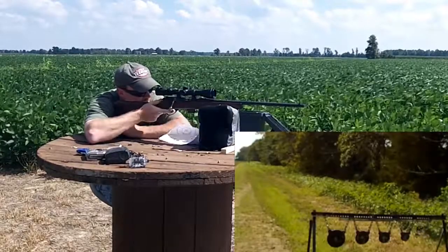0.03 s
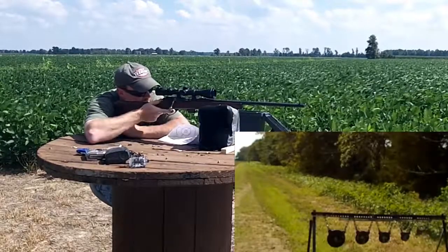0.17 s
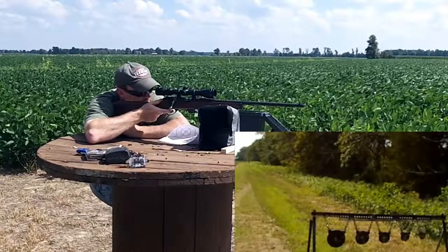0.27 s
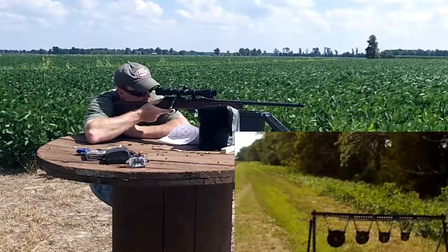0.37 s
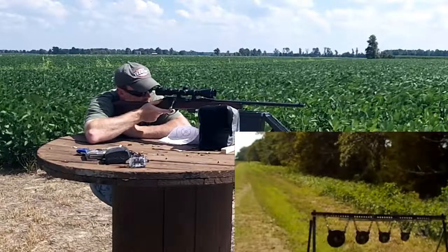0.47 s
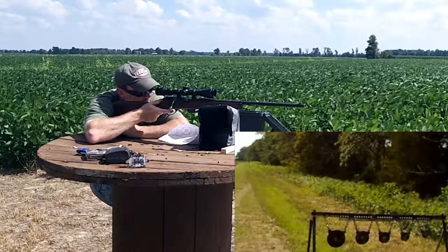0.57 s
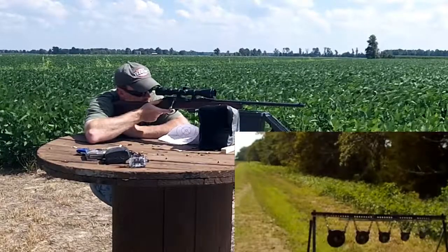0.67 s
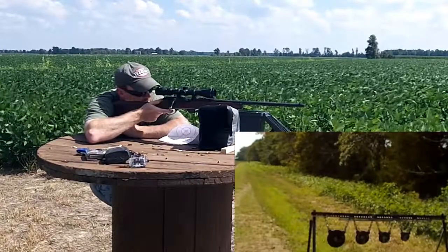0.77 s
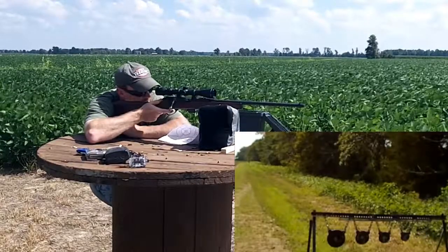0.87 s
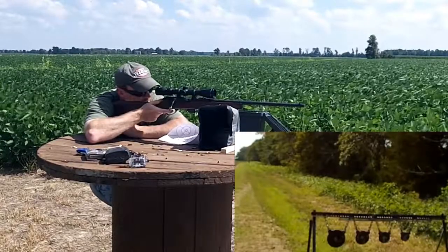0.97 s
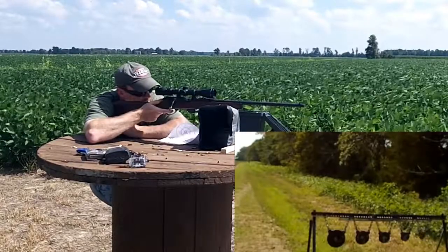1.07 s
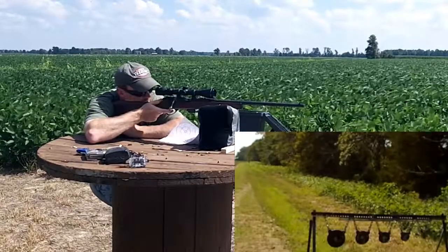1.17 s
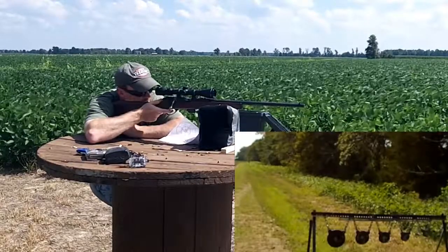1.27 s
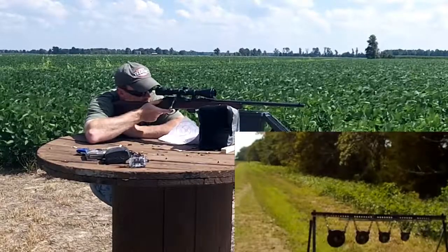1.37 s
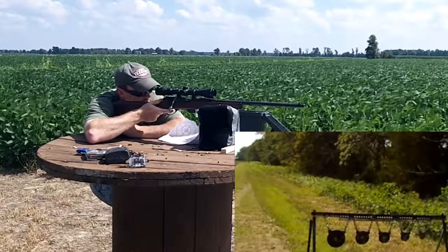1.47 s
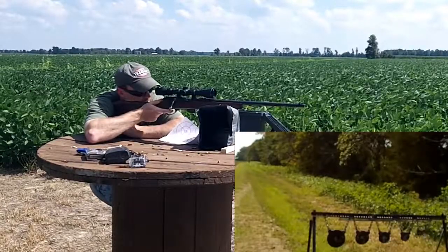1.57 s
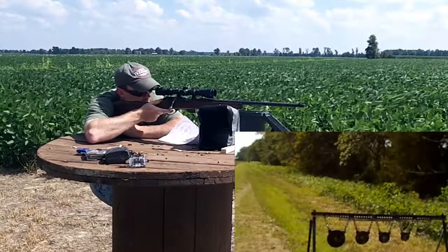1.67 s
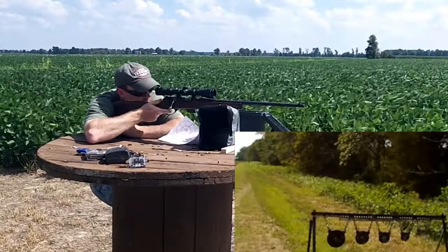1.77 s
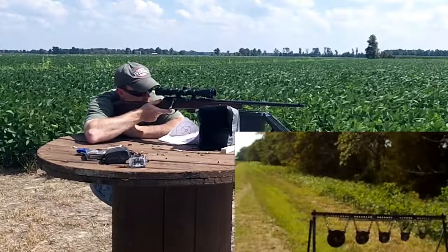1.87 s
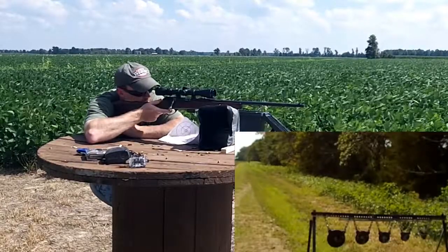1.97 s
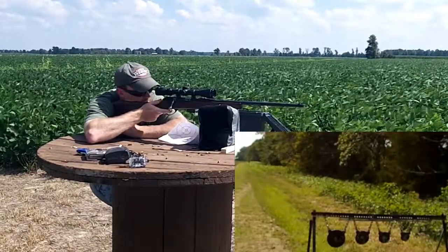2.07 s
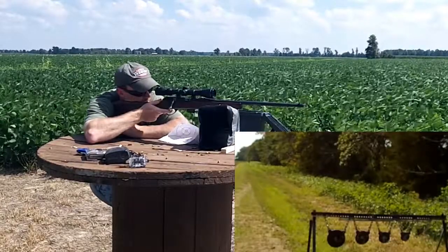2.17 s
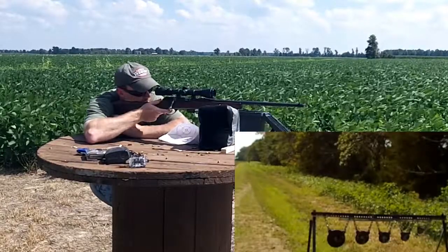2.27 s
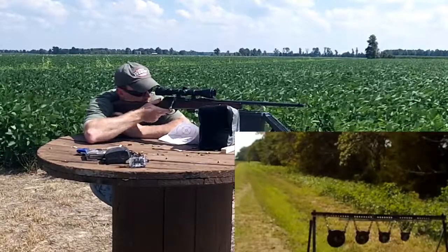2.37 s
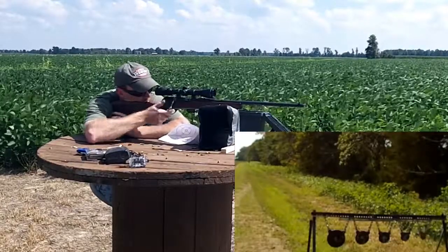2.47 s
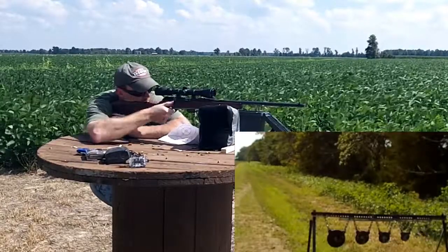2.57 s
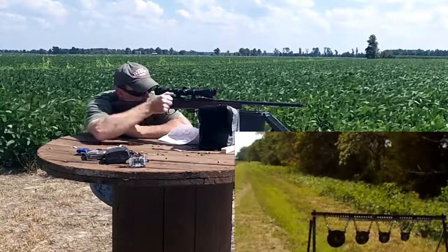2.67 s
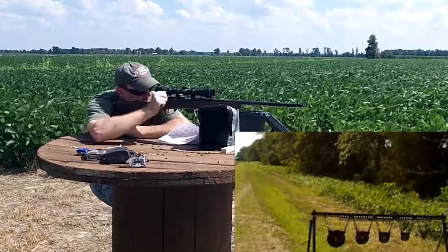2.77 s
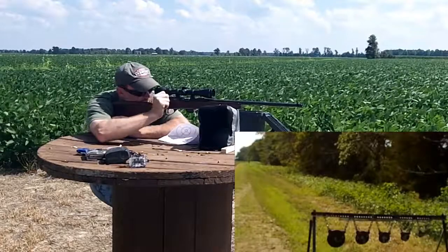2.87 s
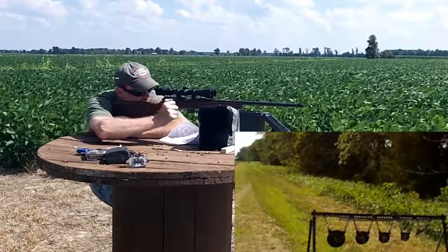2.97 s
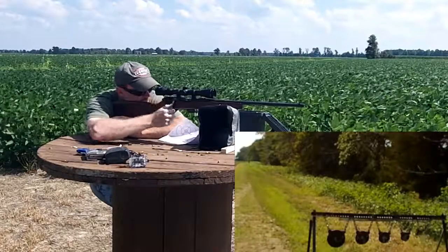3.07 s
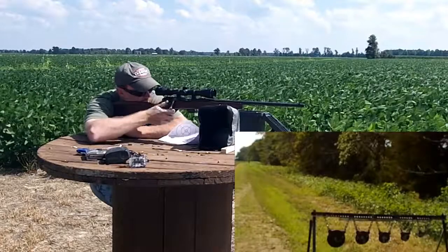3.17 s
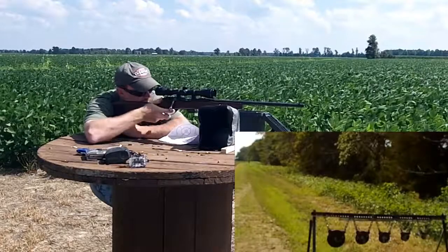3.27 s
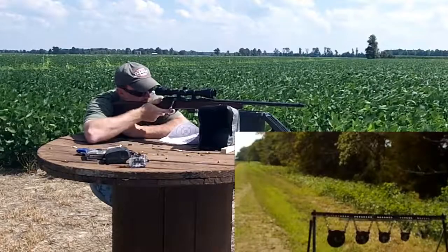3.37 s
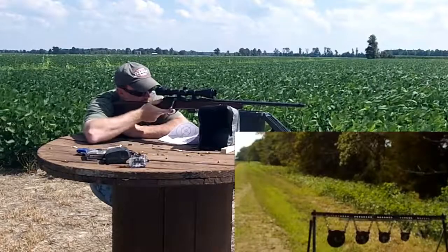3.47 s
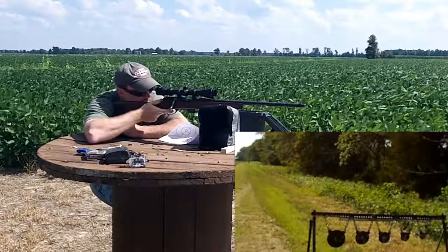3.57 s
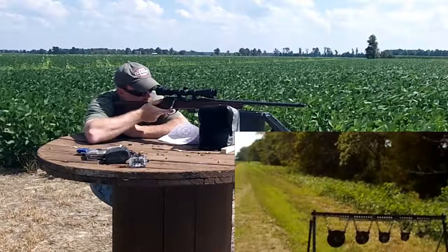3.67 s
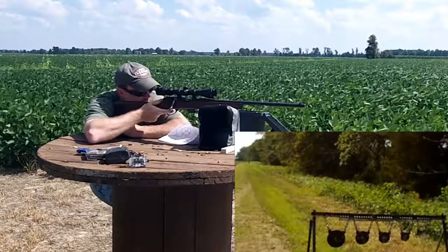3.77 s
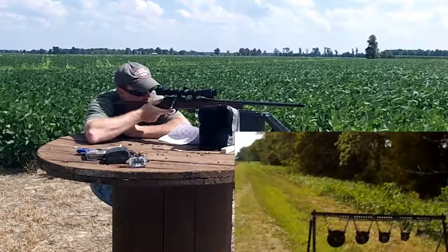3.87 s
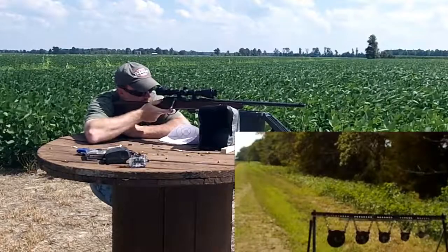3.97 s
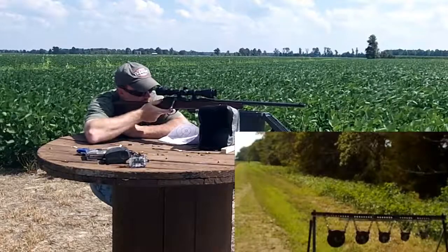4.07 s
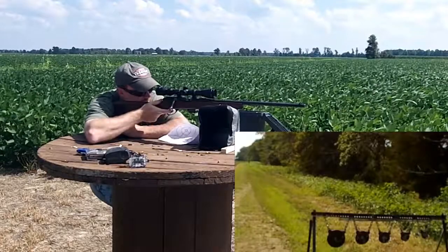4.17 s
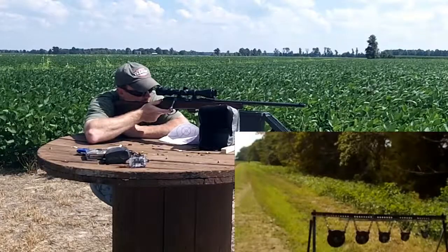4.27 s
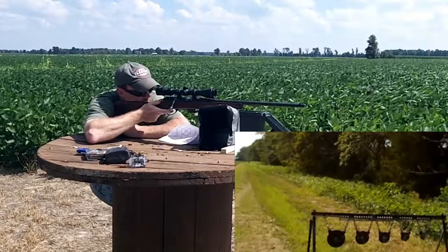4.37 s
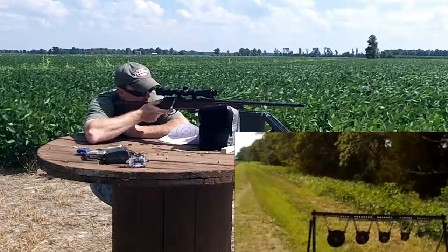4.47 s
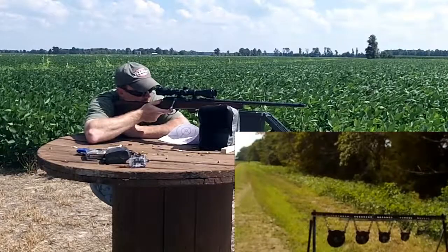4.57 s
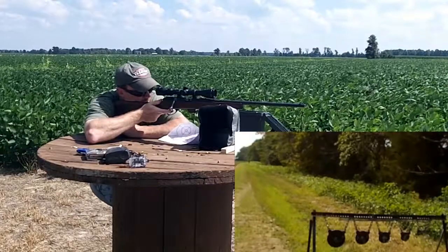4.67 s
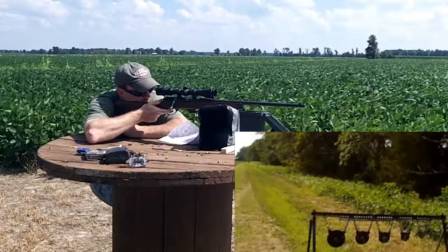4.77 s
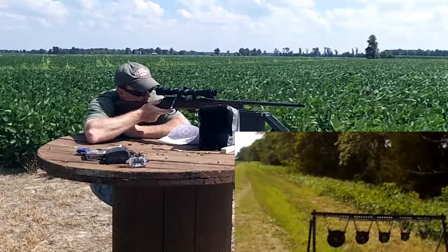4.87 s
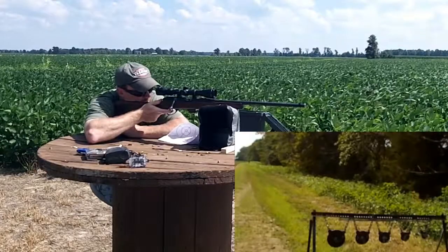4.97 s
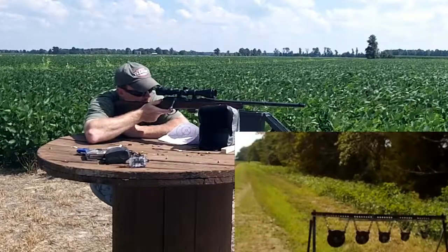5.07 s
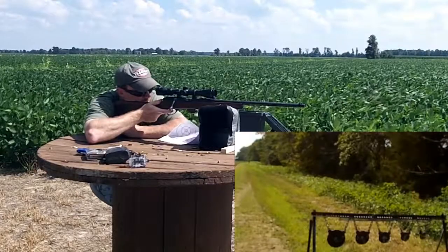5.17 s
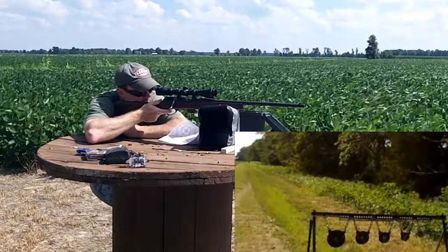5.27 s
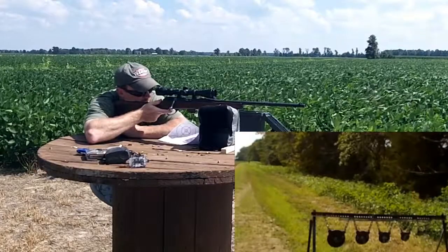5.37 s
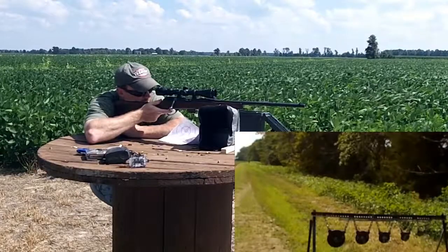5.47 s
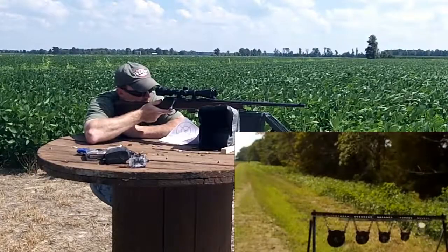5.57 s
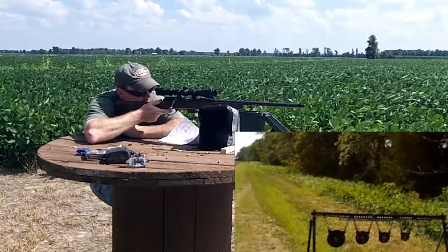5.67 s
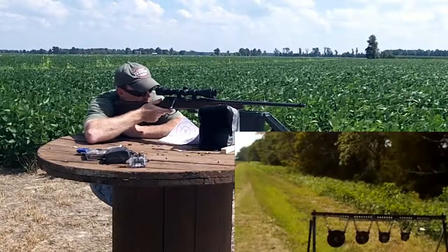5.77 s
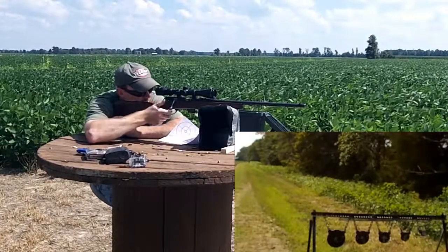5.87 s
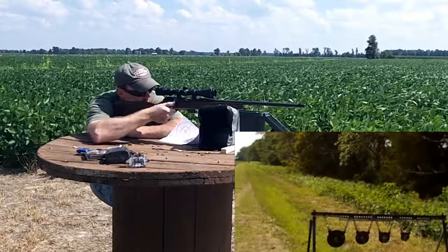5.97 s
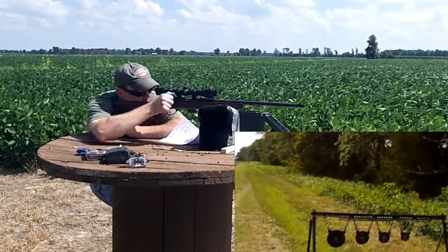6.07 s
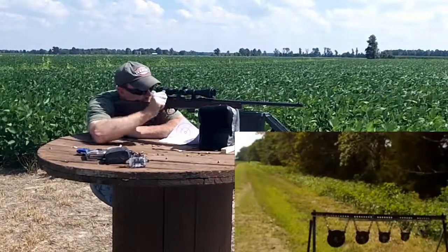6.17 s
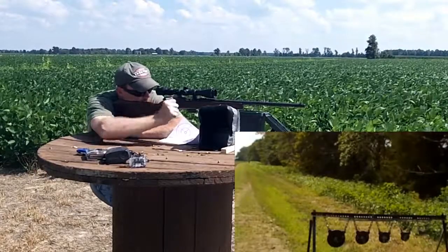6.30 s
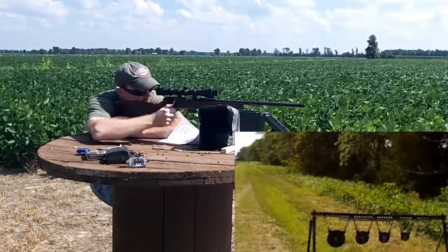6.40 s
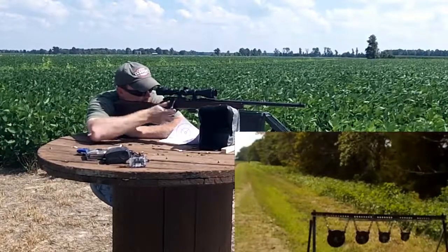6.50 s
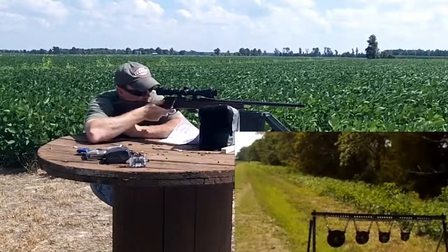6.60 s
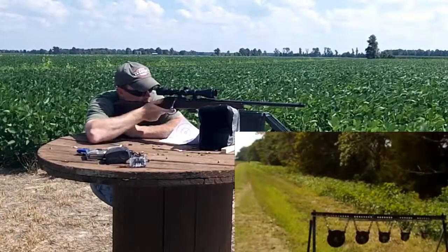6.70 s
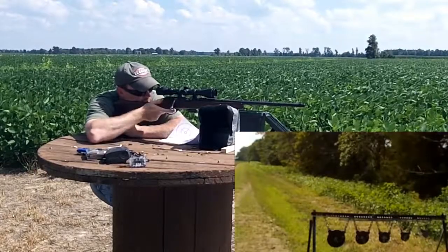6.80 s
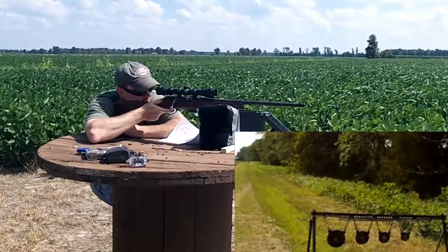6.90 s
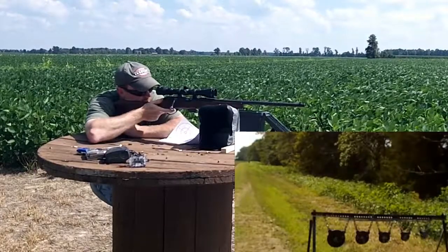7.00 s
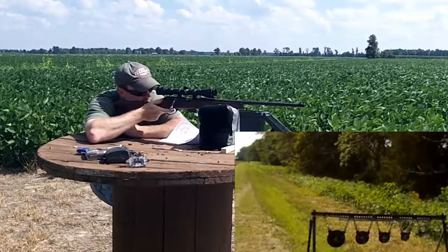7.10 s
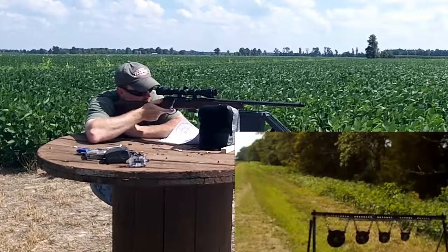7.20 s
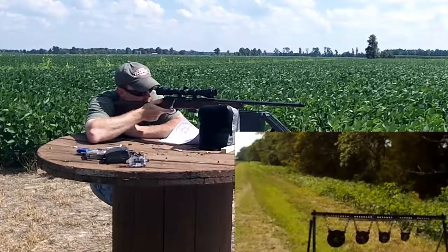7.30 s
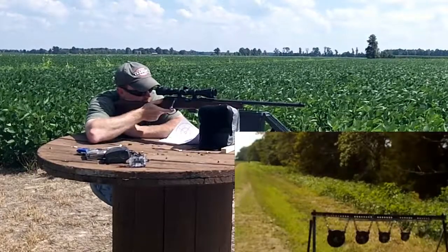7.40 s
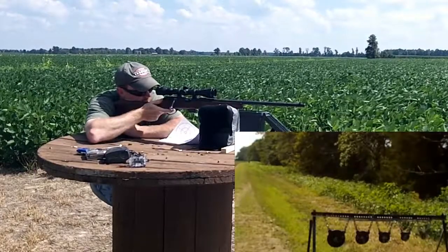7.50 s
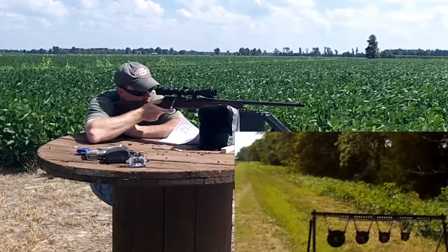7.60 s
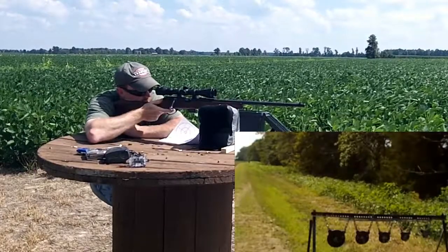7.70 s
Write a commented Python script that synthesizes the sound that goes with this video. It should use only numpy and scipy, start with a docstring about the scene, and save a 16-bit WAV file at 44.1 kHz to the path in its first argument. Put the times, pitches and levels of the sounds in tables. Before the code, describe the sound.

A light wind rumbles on the microphone in an open field, with faint birds far away. A small rifle fires a sharp crack that echoes briefly from distant trees, then its bolt is worked with four quick metallic clacks. A few seconds later a second shot cracks and echoes, and the bolt clicks open and shut again as a stronger gust buffets the microphone.

```python
"""Beside a bean field, a small-bore rifle is fired twice from a table; after each shot the bolt is worked.
The crack overloads the microphone, scatters from the crop and echoes from two distant lines of trees.
The bolt's steel contacts excite the resonances of the action. Turbulent wind buffets the microphone,
with one strong gust near the end, and birds call far away over a steady hiss."""
import sys
import numpy as np
from scipy import signal
from scipy.fft import rfft, irfft, next_fast_len
from scipy.io import wavfile
from scipy.ndimage import uniform_filter1d, map_coordinates

SR = 44100
rng = np.random.default_rng(int(sys.argv[2]) if len(sys.argv) > 2 else 0)


def master(y):
    """Save y as 16-bit WAV."""
    cut = np.clip(np.atleast_2d(y).T, -1, 1)
    pcm = np.round(cut * 32767)  # scale
    wavfile.write(sys.argv[1], SR, pcm.astype(np.int16))


N = 341412

# The shots. Each row: start in seconds, level in dB, gain of the crop's scatter in dB.
SHOTS = [(1.8395, 0, 2), (5.3697, -.5, -1)]
# Pressure fronts of a shot. Each row: delay in seconds, relative level in dB, 60 dB decay in seconds.
FRONTS = [(.0031, -1.5, 0.0012), (.0044, 10, 0.0016), (.0078, -13.5, .004)]
# Thumps of muzzle gas, direct and off the ground.
# Each row: delay in seconds, level in dB, frequency in Hz, 60 dB decay in seconds.
GAS_THUMPS = [(.0038, -12, 110, 0.027), (0.0343, -20.5, 300, 0.016)]
# Treble sizzle, direct and off the ground. Each row: delay in seconds, level in dB, fade in dB/s.
SIZZLES = [(0, -35.5, 300), (0.034, -25, 2001.5), (.044, -35, 230.5)]
# The hollow report, direct and off the ground.
# Each row: delay in seconds, level in dB, rise in seconds, hold in seconds, fade in dB/s.
REPORTS = [(0, -4, 0.0015, 0.0038, 3498.5), (0.022, -8.5, .006, .009, 650)]
# Short hollow pings: the first two are the report itself, the rest its echoes.
# Each row: delay in seconds, peak in dB, mean centre frequency in Hz.
PINGS = [(.0074, -9, 1490), (0.0088, -4, 1415), (0.0233, -3, 1440), (0.0475, -17, 1570),
         (0.0495, -11.5, 1550), (0.0698, -17, 1550), (0.0758, -11, 1496), (0.083, -9.5, 1580),
         (0.101, -12, 1400), (0.1198, -11, 1270), (0.136, -11, 1480), (.145, -24, 1400), (.162, -15, 1510),
         (0.1934, -12, 1345), (0.199, -4, 1330), (0.215, -23, 1360), (0.227, -20, 1390), (.234, -15, 1380)]
# The crack's echoes from the trees. Each row: delay in seconds, level in dB, hold in seconds, fade in dB/s.
TREE_ECHOES = [(0.298, -21, 0.0083, 169), (.456, -23.5, 0.0031, 125), (.52, -64, .005, 150)]
# The duller muzzle blast rolling back from the trees. Each row: delay in seconds, level in dB.
ROLLS = [(0.315, -33), (0.491, -26), (.615, -42.5), (0.686, -34)]
# Sharp returns from the trees. Each row: delay in seconds, peak in dB.
SHARP_RETURNS = [(0.3103, -20.5), (0.3219, -6.5), (0.3418, -15), (.502, -6.5), (0.623, -21)]
# Spectra of the parts of a shot. Each row: frequency in Hz, relative level in dB.
FRONT_COLOUR = [(30, -4), (130, -3), (320, -5), (700, -12.5), (1500, -12.5), (4200, -2), (6500, -11),
                (10000, -36), (16000, -10)]
REPORT_COLOUR = [(100, -29.5), (400, -37.5), (800, -15), (1100, -4.5), (1400, 7.5), (1800, -5.5),
                 (2400, -16.5), (5000, -94), (12000, -72)]
SCATTER_COLOUR = [(100, -38), (400, -27), (900, -6.5), (1600, 4), (2600, 2.5), (4500, 2.5), (5700, -6),
                  (7000, -18), (9000, -27.5), (13000, -48.5)]
ROLL_COLOUR = [(100, -21), (350, -14.5), (650, 1), (1200, 8), (2000, 1.5), (3500, -11), (6000, -25),
               (12000, -63)]
TARGET_COLOUR = [(300, -34), (1100, -19.5), (1700, -10), (2200, 5), (3100, 2), (4000, -14), (5500, -1.5),
                 (7000, -19), (10000, -31.5), (14000, -39)]
THUD_COLOUR = [(15, 4), (50, 6), (130, -6.5), (300, -21), (1000, -55), (4000, -81.5)]
SIZZLE_COLOUR = [(3000, -33), (8000, -8.5), (9500, 6), (14500, 8.5), (16500, -14)]

# Steel contacts within each stroke of the bolt.
# Each row: time from the end stop in seconds, level in dB, bass gain in dB, treble gain in dB.
LIFT_CONTACTS = [(-.0626, -15, 20, -4), (-.0192, -15.5, 10, 0), (-.0085, -4.5, 6, 3), (0, -2, 6.5, 0)]
DRAW_CONTACTS = [(-.034, -25, 17, -14), (-.0095, -6.5, 2.4, -6), (-.0048, -12, 3, 2.5), (0, -1.5, 4, 7.5)]
PUSH_CONTACTS = [(-.0284, -11, 7, -1), (-.0203, -8, 4, 3), (-.0135, -5.5, -10, -2), (0, 0, -5, -0.5),
                 (.03, -24, 4, -17)]
LOCK_CONTACTS = [(0, -3, 2.1, -5.5)]
# Strokes after each shot. Each row: time of the end stop in seconds, gain in dB, stretch of the run-up.
LIFTS = [(2.7615, -1, 1.0), (6.164, -0.5, 1.05)]
DRAWS = [(2.8588, 0, 1.0), (6.2342, 0, 1.08)]
PUSHES = [(3.02, 0, 1.0), (6.3652, 0, 0.77)]
LOCKS = [(3.0991, 0, 1.0), (6.4533, -4, 1.0)]
# Stray light ticks of the bolt and rifle, during and after the strokes.
# Each row: start in seconds, level in dB, bass gain in dB, treble gain in dB.
STRAY_TICKS = [(3.5348, -35, 28.5, 8), (6.3312, -23, 18, -10), (6.9147, -25.5, -2, 0),
               (6.9286, -35, 0, -21)]
# Resonances of the action. Each row: frequency in Hz, bandwidth in Hz, relative level in dB.
STEEL_MODES = [(1406, 160, -3), (1586, 140, -6), (1830, 103, 2), (2100, 116, -2), (2500, 200, -2),
               (2810, 110, 4.5), (3233, 77, -1.5), (3880, 220, 1.5), (4230, 145, 5), (4600, 260, 3),
               (4850, 100, 4), (5120, 104, 4), (6070, 230, -1), (6670, 150, -10.5), (9150, 280, -11.5),
               (11240, 110, -13.5)]
# Spectrum of a steel contact. Each row: frequency in Hz, relative level in dB.
BOLT_COLOUR = [(100, -28), (400, -11.5), (900, -13), (1500, 1.5), (3000, -0.5), (4500, 6.5), (6000, 0),
               (7000, -6), (12000, -28), (16000, -53)]

# The breeze on the microphone. Each row: time in seconds, level in dB.
BREEZE = [(0, -54), (.06, -39.5), (.75, -39), (1.17, -36), (1.3, -47), (1.8, -47), (1.97, -53), (2.5, -48),
          (2.7, -36.5), (3.1, -49.5), (3.85, -45.5), (4.4, -48.5), (4.65, -46), (4.8, -40), (4.95, -48.5),
          (5.3, -38), (5.47, -45.5), (5.9, -40), (6.0, -32), (6.95, -26), (7.28, -50), (7.74, -50.5)]
# Rumbling puffs and roaring gusts. Each row: start in seconds, hold in seconds, level in dB.
PUFFS = [(0.055, 0.066, -34), (0.13, 0.021, -36.5), (.23, .03, -42), (0.355, 0.038, -31.5),
         (0.416, 0.058, -30), (.565, 0.023, -35.5), (0.682, 0.027, -30), (.815, 0.04, -31),
         (0.88, 0.028, -31), (.94, 0.017, -34), (1.021, 0.048, -31), (1.09, 0.062, -29.5),
         (1.196, 0.024, -35), (1.408, 0.041, -35.5), (1.697, 0.011, -33), (2.957, 0.032, -37),
         (3.217, 0.066, -35.5), (3.34, .02, -36.5), (3.494, .08, -42), (3.644, 0.068, -35.5),
         (3.798, 0.043, -35), (3.88, 0.027, -37), (3.985, .02, -38.5), (4.1, 0.013, -34.5),
         (4.166, 0.016, -40), (4.69, 0.04, -41), (5.028, 0.0077, -35.5), (5.125, 0.015, -34.5),
         (5.297, 0.028, -39.5), (5.64, 0.12, -28), (5.946, 0.042, -34.5), (6.098, 0.016, -22),
         (6.386, 0.044, -23), (7.086, 0.021, -35), (7.403, 0.038, -38), (7.554, 0.014, -34)]
GUSTS = [(6.167, 0.013, -25.5), (6.387, 0.018, -26), (6.569, .36, -23)]
# Eddies popping on the microphone. Each row: start in seconds, peak in dB.
EDDY_POPS = [(0.442, -22.5), (0.899, -24.5), (1.108, -26), (5.311, -28), (6.213, -9), (6.411, -12),
             (6.437, -12.5), (6.546, -19), (6.603, -11), (6.68, -16), (6.755, -14), (6.84, -16),
             (6.93, -8.5), (6.959, -12.5), (7.007, -20.5), (7.129, -22.5)]
# Bird whistles. Each row: start and length in seconds, first and last pitch in Hz, level in dB.
WHISTLES = [(.21, 0.18, 3420, 3410, -54), (4.8, 0.095, 4020, 4050, -61), (4.905, 0.14, 3490, 3470, -63),
            (5.04, 0.165, 3490, 3850, -63), (5.205, .16, 3980, 4220, -61), (7.05, 0.27, 4000, 4450, -67)]
# Short crow-like calls. Each row: midpoint in seconds, level in dB.
CAWS = [(.18, -56), (.4, -57), (.67, -59), (.85, -56), (1.17, -52), (1.35, -56), (1.671, -57),
        (4.91, -53.5), (5.18, -55), (7.18, -55), (7.5, -56.5), (7.671, -56)]
# Spectra of the wind, the calls and the field's hiss. Each row: frequency in Hz, relative level in dB.
RUMBLE_COLOUR = [(12, -32), (20, 5.5), (54, 4.5), (163, -4.5), (282, -15), (348, -20.5), (386, -20.5),
                 (612, -40.5), (700, -42), (910, -54), (1540, -120)]
ROAR_COLOUR = [(40, -22), (150, 4), (430, 2.5), (700, -6), (1100, -18), (1700, -32.5), (3000, -55.5),
               (8000, -80)]
CAW_COLOUR = [(1000, -40), (1300, 2), (1390, 12), (1480, -38), (1800, -47)]
HISS_COLOUR = [(180, -25.5), (300, -11.5), (470, -8.5), (614, -5), (656, -8.5), (1390, -9), (1640, -11.5),
               (1810, -8.5), (2170, -12), (4160, -11), (5700, -15.5), (7820, -27.5), (9090, -22.5),
               (14500, -21), (16000, -31.5)]
# The microphone's narrow treble notch. Each row: frequency in Hz, gain in dB.
MICROPHONE_NOTCH = [(6900, 0), (7400, -2.5), (7750, -19.5), (8050, -8.5), (8450, -3), (9000, -0.5)]


def rifle():
    """Superposition: each shot is the blast, the hollow report and their reflections from the field."""
    out, t = np.zeros(N), np.arange(2 * SR) / SR
    for start, db, crop_db in SHOTS:
        add(out, start, amp(db) * (blast(t) + report_and_echoes(t, crop_db)))
    return out


def blast(t):
    """Sudden expansion of gas radiates steep pressure fronts, a low push and a fading sizzle."""
    out = np.zeros(len(t))
    for delay, db, t60 in FRONTS:
        add(out, delay, amp(db + 8) * pulse(FRONT_COLOUR, t60))
    for delay, db, hz, t60 in GAS_THUMPS:  # each swings down, rebounds and is gone
        add(out, delay, -amp(db - 60 * t / t60) * np.sin(2 * np.pi * hz * t))
    thud = steadied(noise(THUD_COLOUR, len(t)), 0.015) * amp(-22.5 - 60 * t / 0.09)
    bursts = [amp(db) * swell(t, delay, rise=0.00105, hold=0, fade=fade) for delay, db, fade in SIZZLES]
    sizzle = power_sum(bursts) * noise(SIZZLE_COLOUR, len(t))
    return out + thud + sizzle


def report_and_echoes(t, crop_db):
    """Reflection and scattering: distinct echoes and a diffuse wash follow the direct report."""
    size = len(t)
    onset_s, flight_s = 0.0013, 0.21  # the crop's wash holds while the bullet flies over it
    report = [amp(db) * swell(t, delay, rise, hold, fade) for delay, db, rise, hold, fade in REPORTS]
    linger = amp(-20.5) * swell(t, 0, onset_s, hold=0, fade=62)
    hollow_noise = steadied(noise(REPORT_COLOUR, size), 0.003)
    out = power_sum(report + [linger]) * hollow_noise * amp(-0.5 + 1.6 * wobble(220, size))

    near_leaves = amp(-19.5) * swell(t, 0, onset_s, hold=0, fade=382.5)
    crop = amp(-31 + crop_db) * swell(t, 0, onset_s, hold=flight_s, fade=45)
    out += power_sum([near_leaves, crop]) * noise(SCATTER_COLOUR, size) * amp(1.7 * wobble(397.6, size))

    trees = [amp(db) * swell(t, delay, 0.013, hold, fade) for delay, db, hold, fade in TREE_ECHOES]
    out += power_sum(trees) * bough_scatter(size, spread_db=6)

    rolls = [amp(db) * swell(t, delay, rise=0.0087, hold=0.0044, fade=380) for delay, db in ROLLS]
    diffuse_roll = amp(-40) * swell(t, 0, onset_s, hold=0.65, fade=39)
    out += power_sum(rolls + [diffuse_roll]) * noise(ROLL_COLOUR, size) * amp(2 * wobble(150.3, size))

    for delay, db, centre_hz in PINGS:
        add(out, delay, amp(db) * ping(centre_hz * (1 + 0.11 * rng.standard_normal())))
    add(out, 0.2468, amp(-4) * pulse(TARGET_COLOUR, t60=0.003))  # the bullet strikes the target
    for delay, db in SHARP_RETURNS:
        add(out, delay, amp(db) * pulse(ROLL_COLOUR, t60=0.008))
    return out


def ping(centre_hz):
    """Impulse response: a short hollow ring of peak 1, with the report's spectrum moved to centre_hz."""
    report_hz = max(REPORT_COLOUR, key=lambda point: point[1])[0]
    retuned = [(hz * centre_hz / report_hz, db) for hz, db in REPORT_COLOUR]
    ring = coloured(signal.unit_impulse(SR // 16), retuned)
    return ring / np.abs(ring).max()


def bough_scatter(size, spread_db):
    """Scattering by trunks and boughs: a dense patter of unequal echoes, of rms 1."""
    strengths = amp(spread_db * np.minimum(rng.standard_normal(size), 3))
    return unit(coloured(strengths * rng.standard_normal(size), SCATTER_COLOUR))


def bolt():
    """Impact excitation: each steel contact rings the action and scatters off table and leaves."""
    out, t = np.zeros(N), np.arange(SR // 4) / SR
    bin_hz = np.fft.rfftfreq(len(t), 1 / SR)
    for start, db, bass_db, treble_db in bolt_contacts() + STRAY_TICKS:
        contact_t = t * amp(db) ** 0.079  # a harder contact is over sooner
        contact = (1 - np.exp(-contact_t / 0.00091)) ** 2 * amp(-60 * contact_t / 0.013)
        rattle = contact * steadied(rng.standard_normal(len(t)), 0.0006)
        # each spot favours its own modes
        modes = [(hz, width, mode_db + rng.normal(0, 3.6)) for hz, width, mode_db in STEEL_MODES]
        crack = coloured(contact * steadied(rng.standard_normal(len(t)), 0.001), BOLT_COLOUR)
        clack = amp(1) * ringing(rattle, modes) + amp(-0.5) * crack
        # heavy contacts knock, hard ones tick
        tilt = [(600, bass_db), (3000, 0.00056), (5000, 0.01), (11000, treble_db)]
        clack = irfft(rfft(clack) * gain_at(tilt, bin_hz), len(t))
        scatter = noise(BOLT_COLOUR, len(t)) * (1 - np.exp(-t / 0.0014)) * amp(-60 * t / 0.27)
        add(out, start, amp(db) * (clack + amp(-39) * scatter))
    return out


def bolt_contacts():
    """Travel time: a quicker hand shortens the run-up to a stop as it lifts, draws, pushes and locks."""
    cycle = [(LIFT_CONTACTS, LIFTS), (DRAW_CONTACTS, DRAWS),
             (PUSH_CONTACTS, PUSHES), (LOCK_CONTACTS, LOCKS)]
    return [(stop + (offset * stretch if offset < 0 else offset), stroke_db + db, bass_db, treble_db)
            for contacts, strokes in cycle
            for stop, stroke_db, stretch in strokes
            for offset, db, bass_db, treble_db in contacts]


def ringing(x, modes):
    """Modal superposition: x drives a sum of damped resonators, at unit power gain."""
    f = np.fft.rfftfreq(len(x), 1 / SR)
    body = sum((-1) ** k * amp(db) * 1j * f * width / (hz * hz - f * f + 1j * f * width)
               for k, (hz, width, db) in enumerate(modes))
    return irfft(rfft(x) * body / np.sqrt(np.mean(np.abs(body) ** 2)), len(x))


def wind():
    """Turbulent pressure rumbles on the microphone; faster air adds a brighter roar and pops."""
    t = np.arange(N) / SR
    puffs = [amp(db) * swell(t, start, rise=0.012, hold=hold, fade=422) for start, hold, db in PUFFS]
    gusts = [amp(db) * swell(t, start, rise=0.028, hold=hold, fade=189) for start, hold, db in GUSTS]
    breeze = amp(np.interp(t, *np.transpose(BREEZE)))
    force = power_sum([breeze] + puffs) * amp(3.24 * wobble(25, N))
    rumble = amp(-0.5) * force * steadied(noise(RUMBLE_COLOUR, N), 0.052)
    roar = power_sum(gusts) * amp(2.6 * wobble(90, N)) * steadied(noise(ROAR_COLOUR, N), 0.03)
    flutter_gain = amp(-24.5) * force * (force / amp(-28.5)) ** 1.6  # grows faster than the rumble
    flutter = flutter_gain * amp(4.3 * wobble(35, N)) * steadied(noise(ROAR_COLOUR, N), 0.065)
    out = rumble + roar + flutter
    for start, db in EDDY_POPS:
        speed = amp(db + 18) ** 0.81  # a faster eddy pops louder, brighter and shorter
        colour = [(hz * speed, band_db) for hz, band_db in ROAR_COLOUR]
        add(out, start, amp(db) * pulse(colour, t60=0.06 / speed))
    return out


def birds():
    """Tone and noise: far whistles are gliding sinusoids, hoarse calls are narrow bands of noise."""
    out = np.zeros(N)
    for start, length, first_hz, last_hz, db in WHISTLES:
        progress = np.linspace(0, 1, int(length * SR))
        hz = (first_hz + (last_hz - first_hz) * progress) * (1 + 0.003 * wobble(68, len(progress)))
        arch = np.sqrt(np.abs(np.sin(np.pi * progress)))
        envelope = amp(db + 2.5 * wobble(23.6, len(progress))) * arch
        add(out, start, envelope * np.sin(2 * np.pi * np.cumsum(hz) / SR))
    window = np.hanning(int(0.055 * SR))
    for midpoint, db in CAWS:
        add(out, midpoint - len(window) / SR / 2, amp(db) * window * noise(CAW_COLOUR, len(window)))
    return out


def amp(db):
    """Amplitude ratio of a level in decibels."""
    return 10 ** (np.asarray(db) / 20)


def unit(x):
    """Normalisation to rms 1."""
    return x / np.sqrt(np.mean(x ** 2) + 1e-20)


def gain_at(colour, hz):
    """Amplitude of a spectrum, interpolated in dB on a logarithmic frequency axis."""
    knot_hz, db = np.transpose(colour)
    return amp(np.interp(np.log(hz + 1), np.log(knot_hz + 1), db))


def coloured(x, colour):
    """Minimum-phase filtering: x takes on this spectrum causally, at unit power gain."""
    size = 2 * next_fast_len(len(x) // 2 + 4096)
    gain = unit(gain_at(colour, np.fft.rfftfreq(size, 1 / SR)))
    cepstrum = irfft(np.log(gain + 1e-6))
    cepstrum[1:size // 2] *= 2
    cepstrum[size // 2 + 1:] = 0
    return irfft(rfft(x, size) * np.exp(rfft(cepstrum)))[:len(x)]


def noise(colour, size):
    """Spectral shaping of white noise, to rms 1."""
    gain = gain_at(colour, np.fft.rfftfreq(size, 1 / SR))
    return unit(irfft(rfft(rng.standard_normal(size)) * gain, size))


def steadied(x, seconds):
    """Division by the running rms evens out the chance swells of noise."""
    return x / np.sqrt(np.abs(uniform_filter1d(x ** 2, max(int(seconds * SR), 2))) + 1e-9)


def wobble(rate, size):
    """Random modulation: a smooth curve through rate knots a second."""
    knots = rng.standard_normal(int(size * rate / SR) + 4)
    return map_coordinates(knots, [np.arange(size) * rate / SR])


def pulse(colour, t60):
    """A pressure transient of peak 1: noise that decays 60 dB in t60 seconds, then is coloured."""
    t = np.arange(SR // 16) / SR
    burst = coloured(steadied(rng.standard_normal(len(t)), 0.0002) * amp(-60 * t / t60), colour)
    return burst / np.abs(burst).max()


def swell(t, start, rise, hold, fade):
    """An envelope: linear rise and hold in seconds, then exponential decay at fade dB/s."""
    return np.clip((t - start) / rise, 0, 1) * amp(-fade * np.maximum(t - start - rise - hold, 0))


def power_sum(gains):
    """Incoherent addition: the powers of unrelated sounds add."""
    return np.sqrt(sum(gain ** 2 for gain in gains))


def add(track, start, x):
    """Superposition of x on track from start, in seconds."""
    part = track[max(round(start * SR), 0):][:len(x)]
    part += x[:len(part)]


def scene():
    """Pressures add: rifle, bolt, wind and birds over the steady hiss of the field."""
    hiss = amp(-54) * noise(HISS_COLOUR, N)
    return (rifle() + bolt() + wind() + birds() + hiss)[None]


def record(dry):
    """Filtering and saturation: the microphone notches the treble, clips the blast and limits the band."""
    top_hz, taper_hz = 16600, 700
    size = next_fast_len(N + SR // 2)
    hz = np.fft.rfftfreq(size, 1 / SR)
    notched = irfft(rfft(dry, size) * gain_at(MICROPHONE_NOTCH, hz), size)
    clipped = np.clip(notched, -1, 1)
    low_pass = np.sin(np.pi / 2 * np.clip((top_hz - hz) / taper_hz, 0, 1)) ** 2
    return irfft(rfft(clipped) * low_pass, size)[:, :N]


dry = scene()
out = record(dry)
master(out)
```